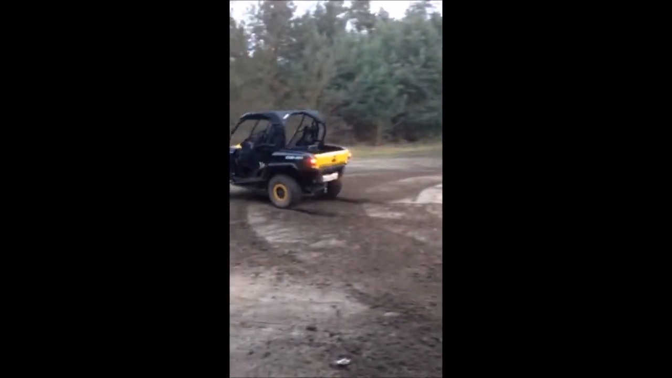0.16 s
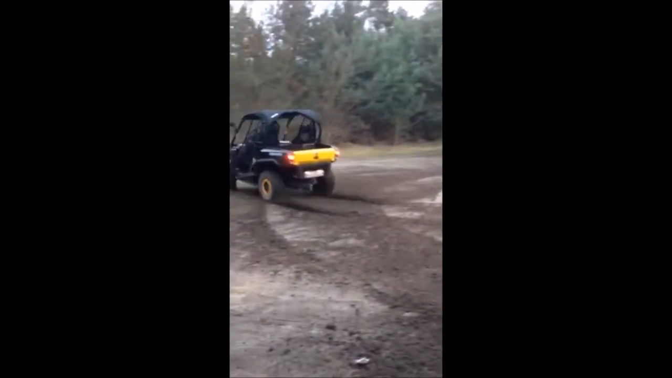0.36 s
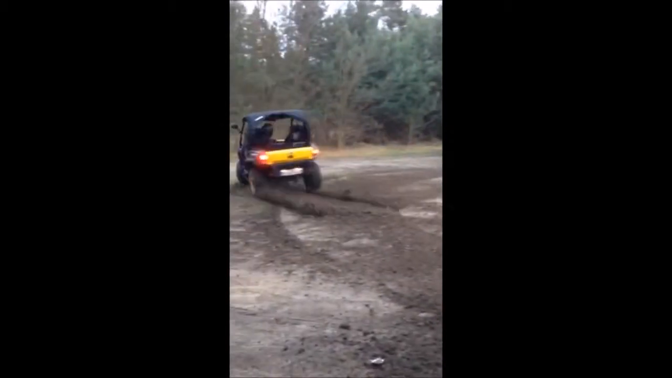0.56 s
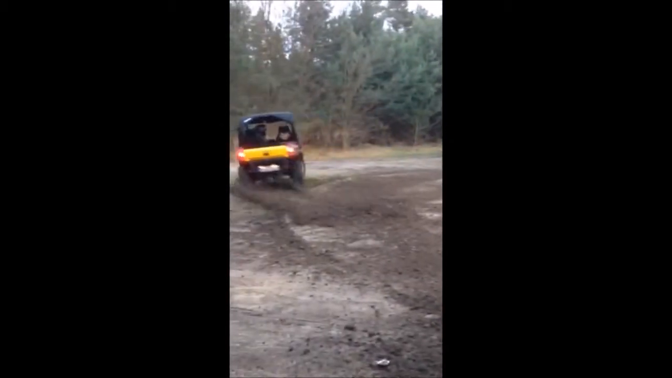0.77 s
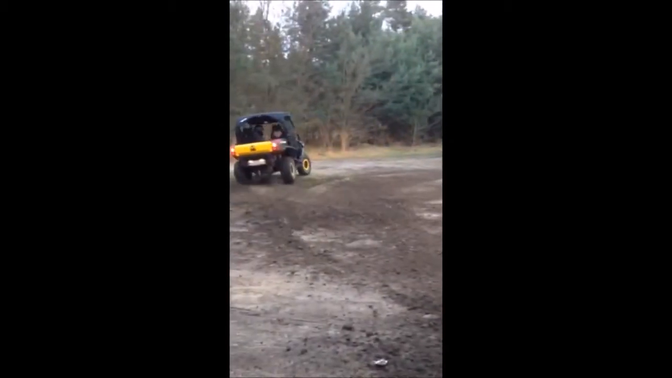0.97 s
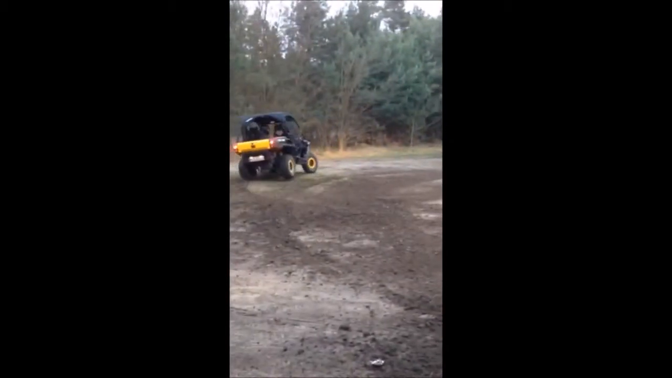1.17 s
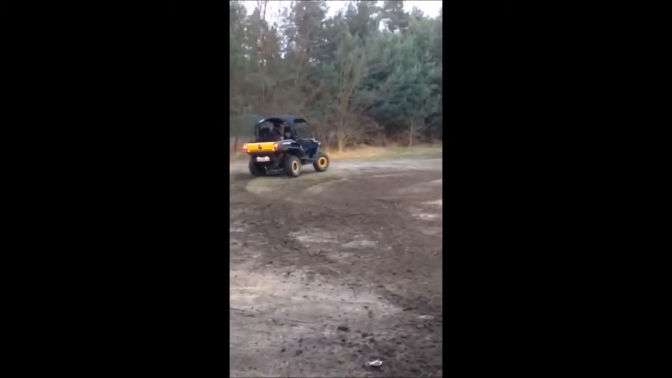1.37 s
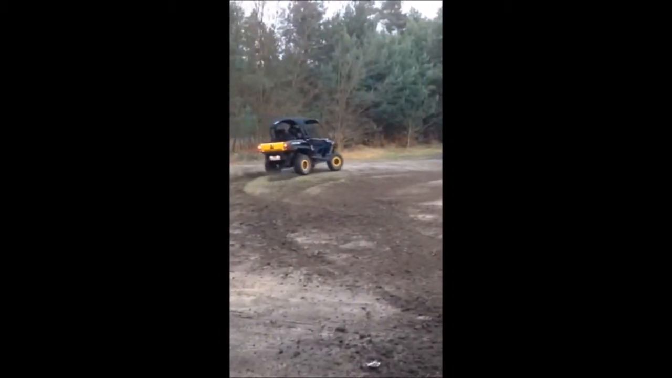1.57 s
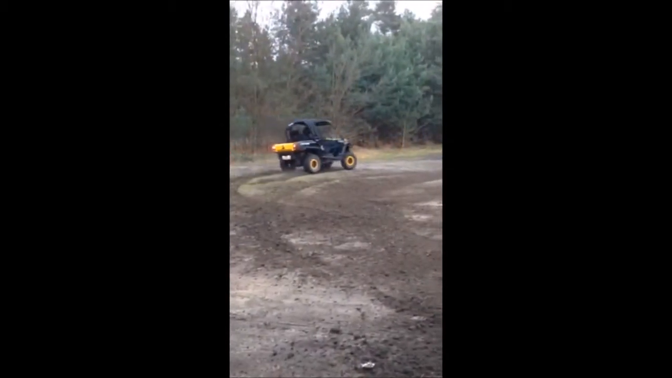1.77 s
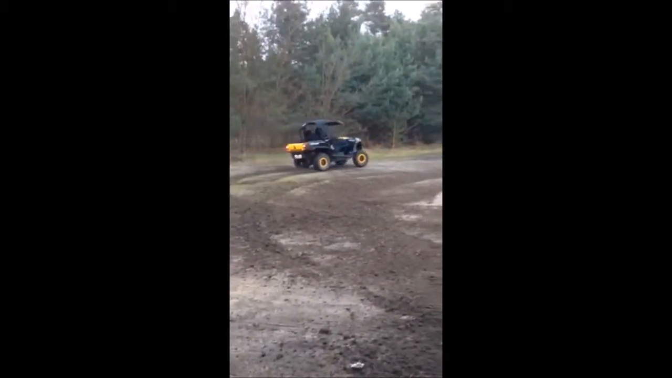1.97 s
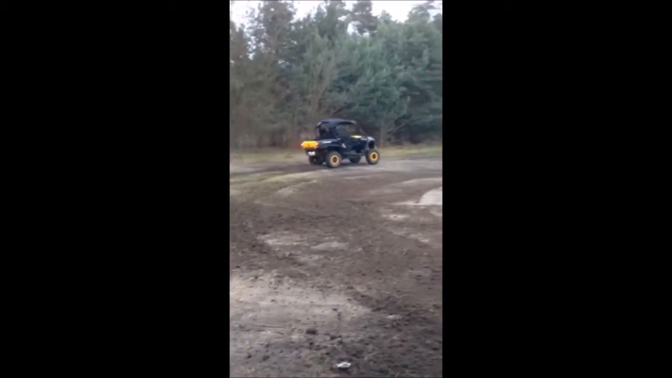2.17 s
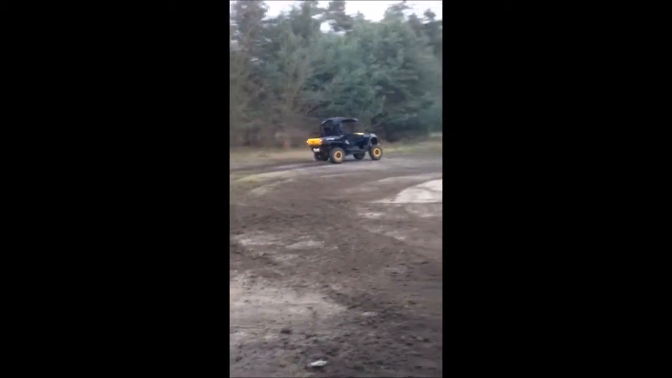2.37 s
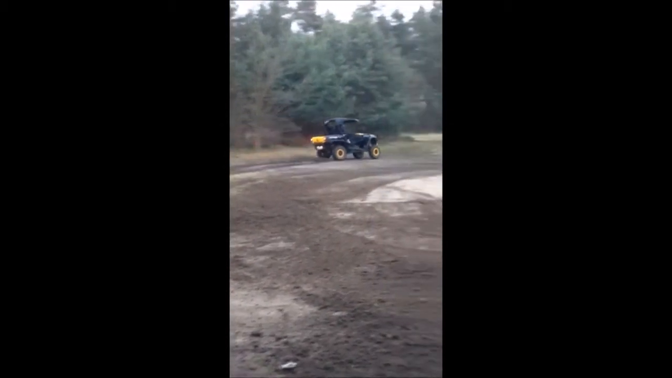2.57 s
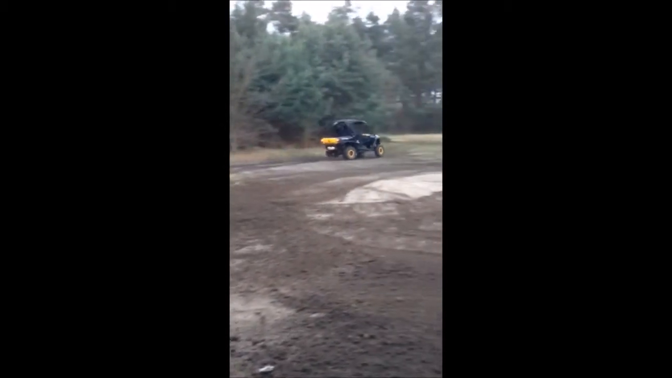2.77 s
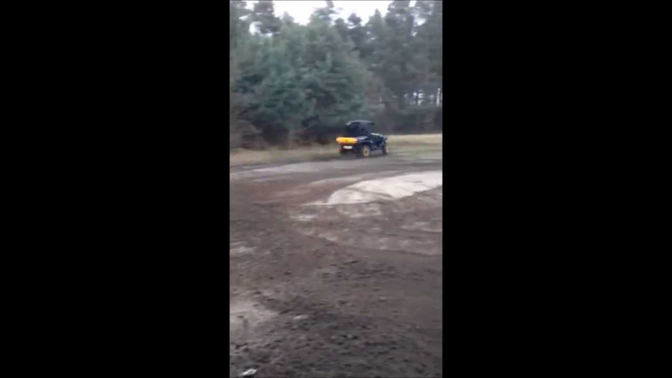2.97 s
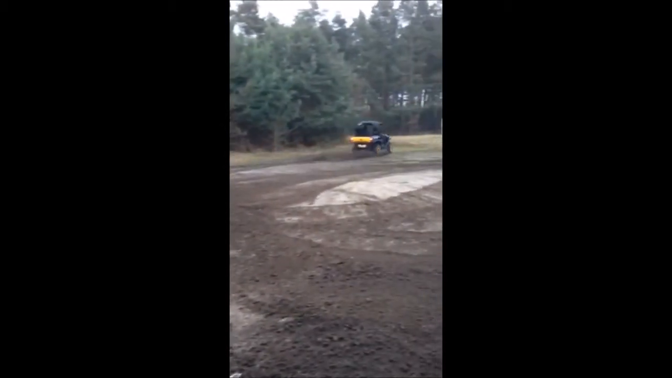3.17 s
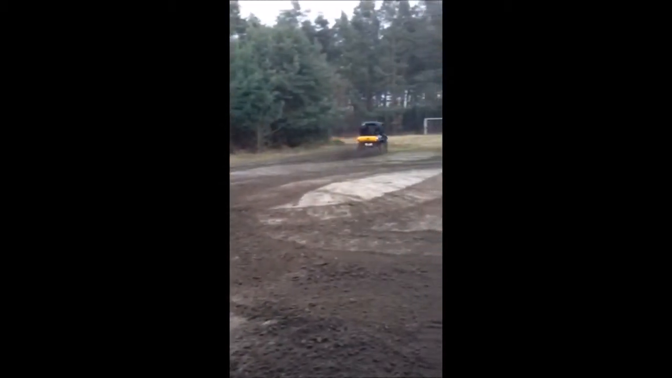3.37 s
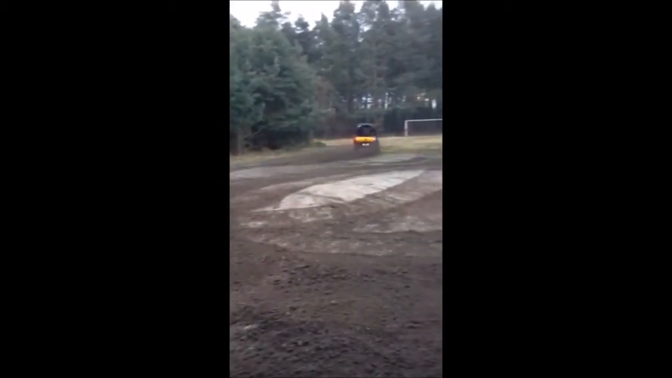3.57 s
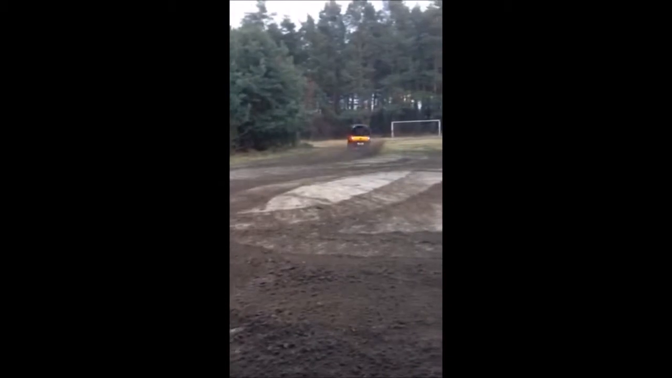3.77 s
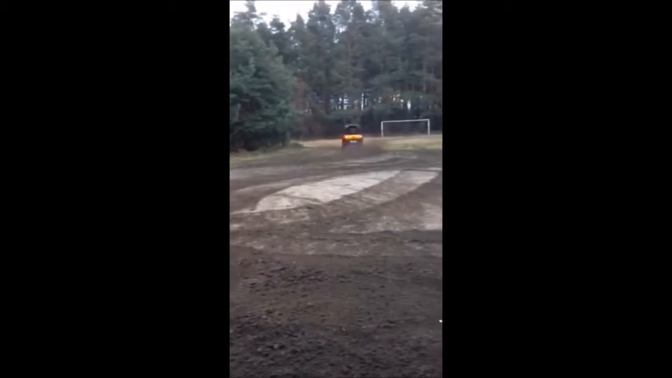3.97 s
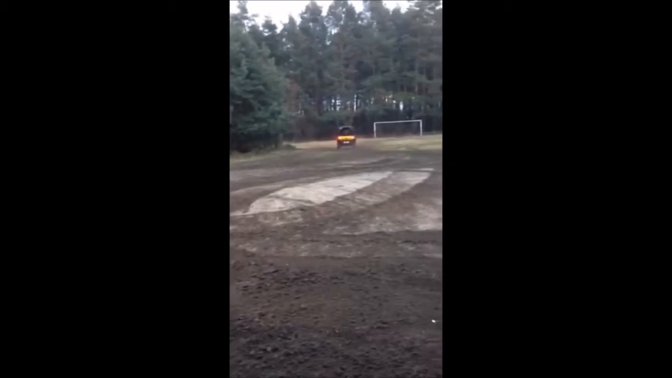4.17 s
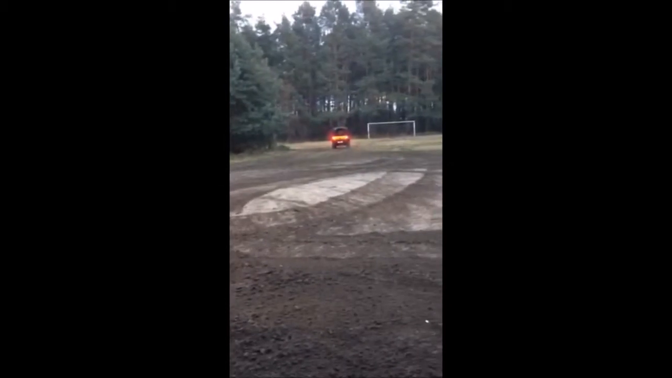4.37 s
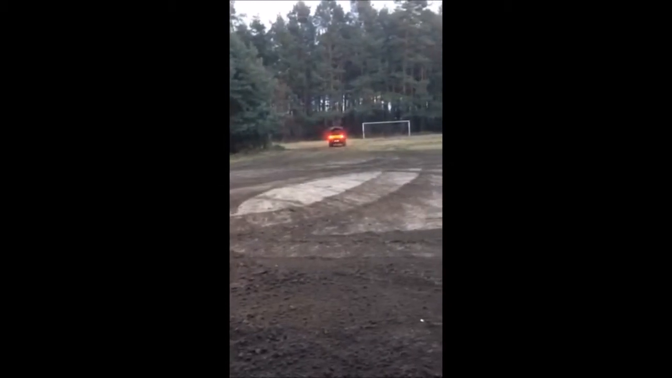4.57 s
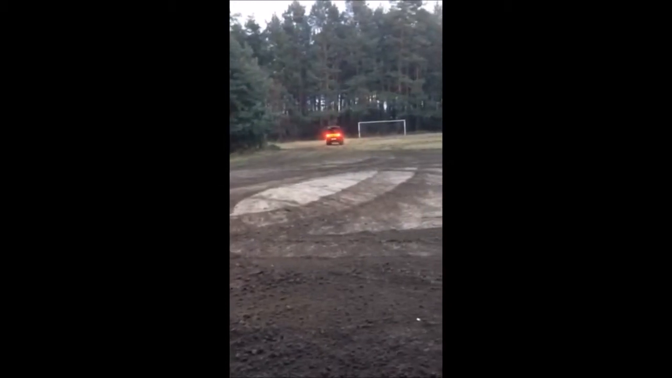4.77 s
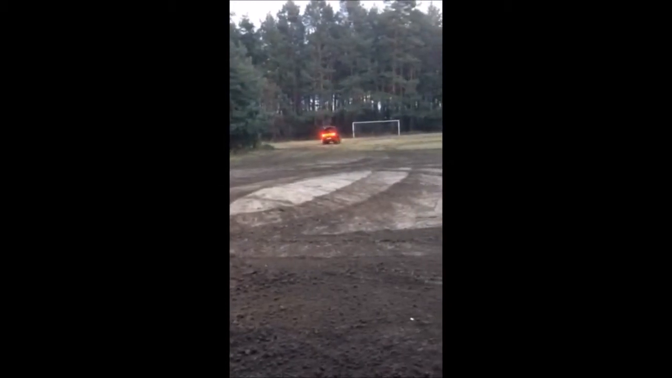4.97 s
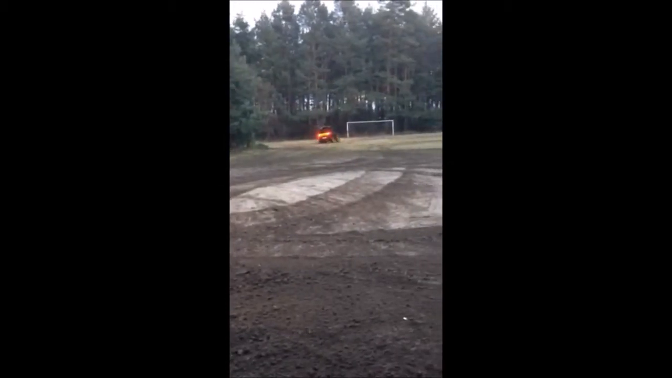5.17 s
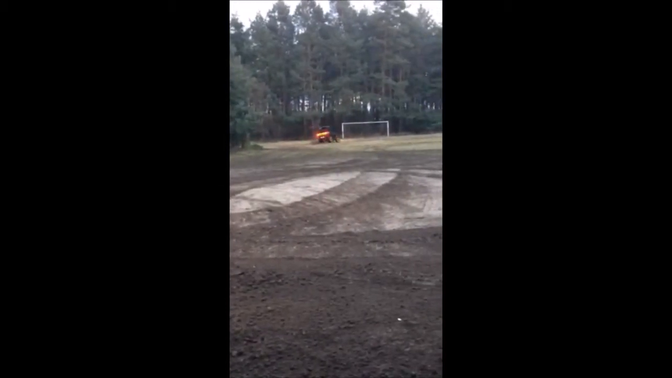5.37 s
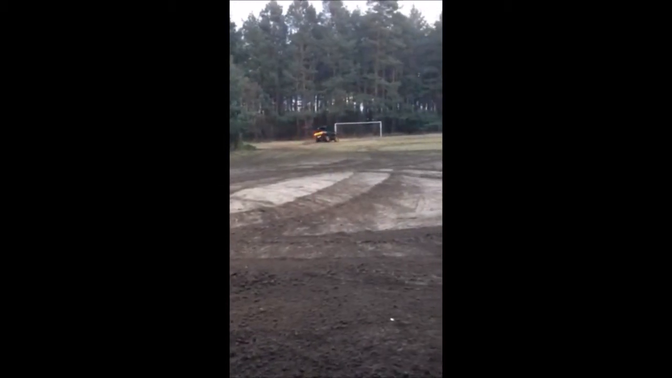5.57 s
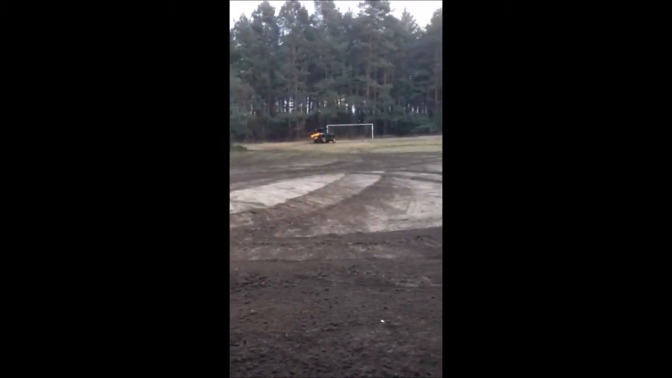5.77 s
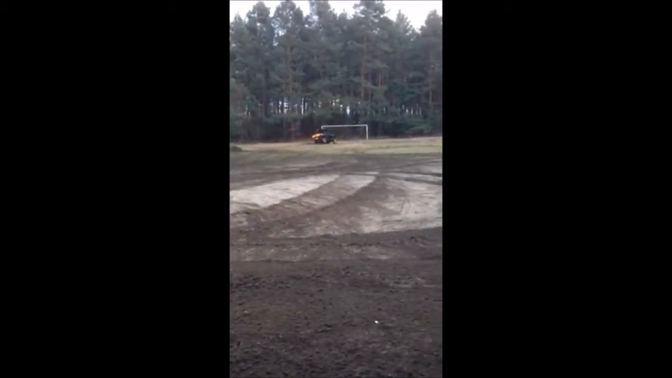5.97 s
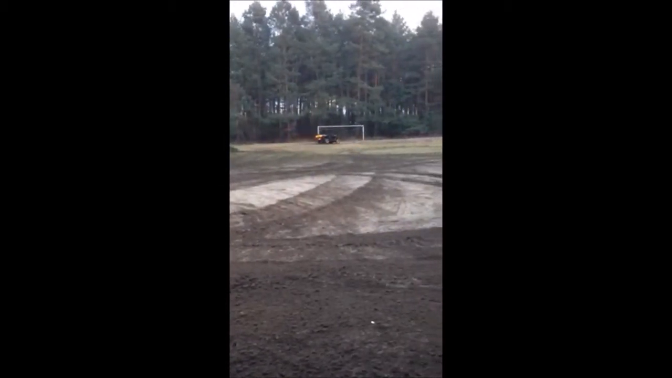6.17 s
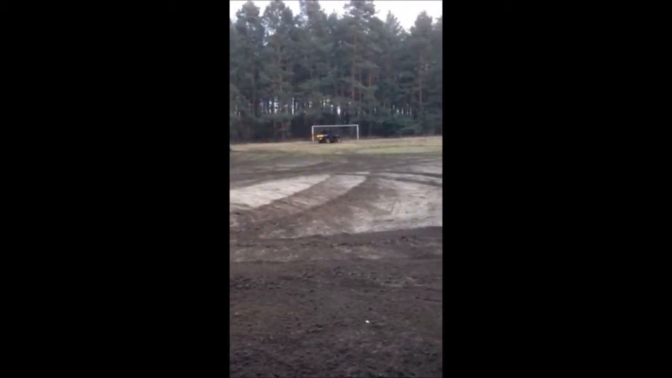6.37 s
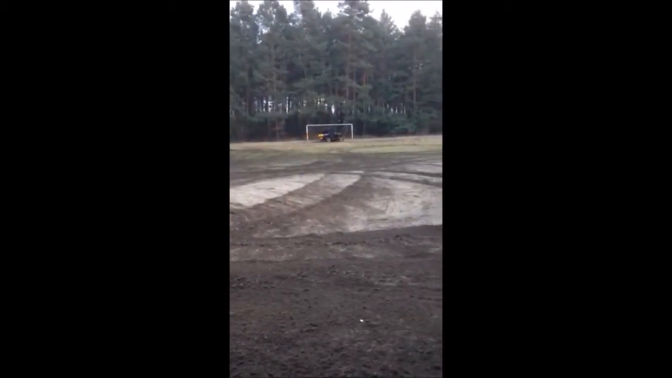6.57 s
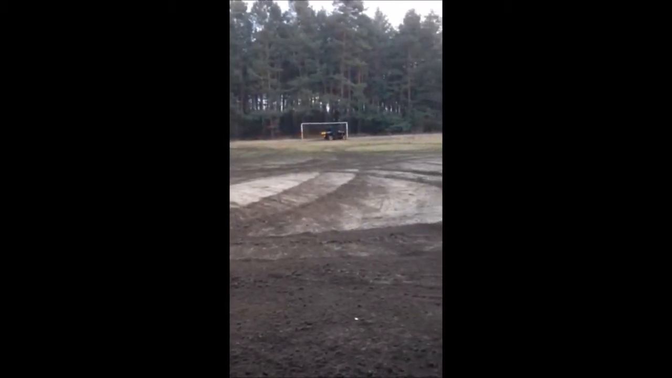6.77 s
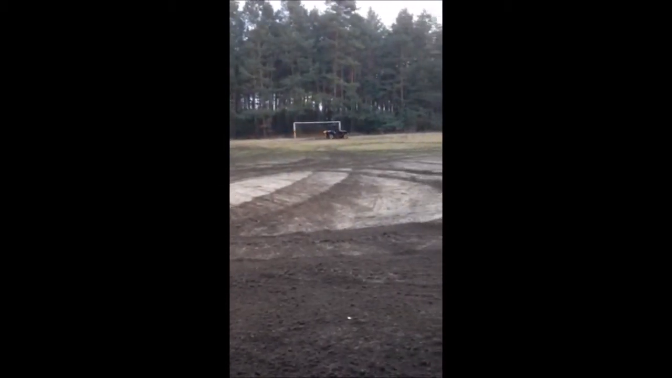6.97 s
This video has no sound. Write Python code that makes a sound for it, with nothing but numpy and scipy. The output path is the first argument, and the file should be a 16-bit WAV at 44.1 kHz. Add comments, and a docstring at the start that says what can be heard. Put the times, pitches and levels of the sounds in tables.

```python
"""A buggy drives off through mud

A V-twin buggy blips its throttle close by, pulls away, coasts far off and blips again.
Its two cylinders fire in an uneven pair into a booming exhaust, each firing with a puff of rasping gas.
Throttle, engine speed, distance and heading set how loud each of the engine's voices is.
The tyres spray soil, the gears whine as the buggy slows, and a wood sends back a faint echo."""
import sys
import numpy as np
from scipy import signal
from scipy.fft import irfft
from scipy.io import wavfile
from scipy.ndimage import uniform_filter1d, map_coordinates

SR = 44100
rng = np.random.default_rng(int(sys.argv[2]) if len(sys.argv) > 2 else 0)


def dump_mix(stems):
    """Bounce the given channels to the path in sys.argv[1] as a 16-bit WAV at rate SR."""
    frames = np.atleast_2d(stems).T  # one column per channel
    limited = np.clip(frames, -1, 1)  # hard clip at full scale
    pcm = np.round(limited * 32767).astype(np.int16)
    wavfile.write(sys.argv[1], SR, pcm)


N = 310023
TIME = np.arange(N) / SR

# low rumble of the open air: f/Hz, level/dB
AIR_SPECTRUM = [(20, -15), (54, -11), (90, 1.5), (150, 6.5), (300, -0.5), (700, -24), (2000, -14),
                (6000, -40), (15000, -48)]
# how far away the buggy is: t/s, distance/m
PATH = [(0, 5.37), (.5, 8.1), (1.1, 18.4), (1.5, 16.5), (2.3, 17.8), (3.7, 18.7), (4.6, 29.6), (5.5, 40),
        (6.2, 81), (7.03, 99)]
# how it is turned: t/s, heading (0 = tail towards the listener, 1 = side on)
SIDE_ON = [(0, 0), (.55, 0.22), (.78, 0.21), (1.18, 0.003), (1.34, 0.23), (1.85, 0.37), (2.25, 0.69),
           (3.1, 0.73), (3.45, 0.36), (3.8, 0.058), (5, 0.12), (6.2, 0.35), (7.03, 0.65)]
# the gear shaft slows with the wheels, then picks up: t/s, f/Hz
SHAFT_SPEED = [(4.42, 728), (4.68, 697), (4.85, 684), (5.04, 617), (5.28, 592), (5.46, 577), (5.62, 535),
               (5.75, 484), (5.92, 459), (6.1, 425), (6.28, 375), (6.42, 362), (6.88, 492)]
# spells in which gears sing: start/s, end/s, multiple of the shaft speed, start level/dB, end level/dB
GEAR_WHINES = [(4.58, 4.987, 5, -51, -53), (4.58, 5.06, 6, -54, -56), (4.92, 5.6, 5, -56, -53),
               (4.98, 5.68, 6, -48.5, -54), (5.697, 6.16, 9, -56.5, -51), (6.222, 6.562, 9, -63, -58),
               (6.83, 7.024, 9, -49, -50)]
# swells of noise from tyres, engine and brakes: t/s, half length/s, churning/dB, hiss/dB, spray/dB
NOISE_SWELLS = [(2.128, 0.091, -35.5, -32, -37), (2.83, 0.067, -72, -68, -31), (3.068, 0.02, -50, -52, -30),
                (3.366, 0.32, -60, -33.5, -62), (4.06, 0.22, -47, -49, -73), (4.83, 0.37, -59, -51, -68),
                (5.396, 0.23, -61, -49.5, -61), (6.277, 0.49, -48, -56.5, -80),
                (6.78, 0.089, -82, -65, -48.5)]
# a churning noise: f/Hz, level/dB
CHURN_SPECTRUM = [(400, -1), (750, 9.5), (1080, 13), (1300, 4), (1700, 8), (2300, -0.5), (3200, -19),
                  (6000, -22)]
# a high spray of fizz and soil: f/Hz, level/dB
SPRAY_SPECTRUM = [(3000, -4), (6000, 0), (7200, -3), (8800, -4), (9900, -3.5), (11000, -7.5),
                  (13000, -10.5), (15500, -20)]

# engine cycles a second: t/s, f/Hz
ENGINE_SPEED = [(0.0, 29.55), (0.11, 37.18), (0.46, 50.99), (0.61, 49.85), (1.03, 27.61), (1.23, 25.95),
                (1.42, 39.82), (1.84, 43.09), (2.22, 50.88), (2.9, 55.15), (2.99, 53.76), (3.22, 56.12),
                (3.78, 55.27), (4.27, 42.1), (4.5, 33.93), (4.87, 33.58), (5.03, 31.22), (5.5, 31.55),
                (5.73, 28.05), (6.07, 27.51), (6.44, 24.64), (6.66, 38.88), (6.85, 43.92), (7.03, 40.38)]
# throttle presses: opens/s, starts to shut/s, closing time/s, depth (1 = full), extra share at the start
THROTTLE_PRESSES = [(-.03, 0.535, 0.27, 0.78, 0.32), (1.245, 3.797, 0.36, 0.79, 0.59),
                    (3.953, 4.22, 0.12, 0.12, 0), (6.502, 6.837, 0.27, 1.15, 0.23)]
# each voice by name ("order k" is the tone at k times the engine speed): base level/dB, then the change
# for full throttle/dB, doubled engine speed/dB, turning side on/dB, doubled distance/dB
VOICE_LEVELS = { "order 1": (-49, 4, 27, -2, -4), "order 2": (-27.5, 2, 11, 4.5, -5),
                "order 3": (-21, 2.5, 17.5, -7.5, -3), "order 4": (-22, 8, 5.5, 0, -4.5),
                "order 5": (-39, -1, 21, 2.5, -2), "order 6": (-35.5, 14.5, -5, -7, -5),
                "bark": (-33, 9.5, 3, 0.5, -6.5), "chuff": (-31.5, 5, 7.5, -4.5, -6),
                "knock": (-43.5, 7, 6, 9.5, -13.5), "clatter": (-40.5, 1.5, 10, 9, -6.5),
                "rasp": (-45.5, 10, 0.5, 14, -7), "spray": (-50, 10, 5, 17.5, -8.5), }
# ringing notes of the engine's covers: f/Hz, width/Hz, level/dB
COVER_RINGS = [(935, 90, -7), (1605, 90, 4), (1785, 90, 1), (2050, 90, -3), (2466, 60, -4)]
# engine clatter: f/Hz, level/dB
CLATTER_SPECTRUM = [(400, -25), (850, 7), (1000, 11.5), (1300, 5), (1620, 2.5), (2000, -0.5), (2400, 6.5),
                    (3500, -22)]
# a hard knock that only carries a few metres: f/Hz, level/dB
KNOCK_SPECTRUM = [(700, -17.5), (1200, -5), (1650, -10.5), (2100, -15.5), (2800, -17), (6000, -39)]
# a rasping hiss: f/Hz, level/dB
RASP_SPECTRUM = [(1200, 0.5), (2200, -6.5), (2700, 7.5), (3900, 8), (5000, 3), (6300, -5.5), (8000, -9),
                 (14000, -70)]
# a duct resonance swells or dips: t/s, half length/s, f/Hz, change/dB
DUCT_HOWLS = [(0.463, 0.11, 485, 3.5), (0.537, 0.058, 636, 5.5), (2.02, 0.069, 442, 9.5),
              (2.173, 0.073, 492, 7.5), (2.093, 0.12, 636, 9.5), (2.38, 0.15, 700, 9),
              (2.902, 0.025, 880, 12.5), (3.05, 0.25, 540, -13), (3.063, 0.17, 910, 3),
              (3.248, 0.43, 614, 7.5), (3.49, 0.41, 420, 7), (4.084, 0.13, 2550, 5.5),
              (6.717, 0.29, 430, 9)]
# firings that crack out under load: t/s, ping/dB, hiss/dB
LOUD_FIRINGS = [(0.071, -19, -17), (0.099, -19, -14), (0.125, -16, -18), (0.151, -17, -25),
                (0.176, -11, -27), (0.2735, -8.5, -24), (1.44, -33, -19), (3.077, -30, -17),
                (3.363, -30, -19)]
# a hard firing rings the covers: f/Hz, level/dB
PING_SPECTRUM = [(900, -34), (1650, 3), (2000, -7), (3200, -33)]
# pops on a shut throttle: t/s, level/dB
PIPE_POPS = [(0.979, -27), (1.049, -22), (1.222, -28)]
# a soft pop in the pipe: f/Hz, level/dB
POP_SPECTRUM = [(60, 0), (190, 3), (400, 1), (900, -37), (2000, -60)]
# gas puffing out of the pipe: f/Hz, level/dB
CHUFF_SPECTRUM = [(20, -19), (50, -3), (110, 0), (200, 10), (320, 7.5), (500, 2), (750, 0), (1000, -10),
                  (1400, -55)]
# how the exhaust pipe shapes its tones: f/Hz, level/dB
PIPE_SPECTRUM = [(55, -7), (110, 13.5), (165, 18.5), (230, 0), (300, -5.5), (400, -11.5), (500, -13.5),
                 (620, -18), (760, -24), (1000, -25), (1500, -45.5)]
# an exhaust tone fades or swells for a moment: t/s, order, half length/s, change/dB
TONE_FADES = [(0.4, 12, 0.25, 7), (0.843, 3, 0.078, -24), (1.157, 4, 0.2, -4.5), (1.475, 4, 0.14, 4.5),
              (1.644, 10, 0.69, 6), (2.262, 4, 0.17, -15), (3.07, 17, 0.1, 10), (3.416, 2, 0.34, -14),
              (3.975, 4, 0.082, -10), (4.838, 3, 1, -13), (5.2, 2, 0.69, -4.5), (6.13, 4, 0.56, -4)]

NEAR_M, CRUISE_HZ = 10, 40  # distance and engine speed at which the base levels hold
PAIR_GAP = 0.2904  # the second cylinder fires this share of a cycle after the first


def amp(db):
    """Turns decibels into a gain."""
    return 10 ** (np.asarray(db) / 20)


def unit(x):
    """Scales a signal to an average size (rms) of 1."""
    return x / np.sqrt(np.mean(x ** 2) + 1e-20)


def curves(rows):
    """Joins each column of a table with straight lines in time."""
    times, *columns = np.transpose(rows)
    return [np.interp(TIME, times, column) for column in columns]


def swell(s, half_s):
    """A smooth rise and fall around the moment s."""
    return np.exp(-((TIME - s) / half_s) ** 2)


def wander(rate):
    """A smooth random wobble with about rate new values a second."""
    values, coarse = rng.standard_normal(4096), TIME[::32]
    smooth = map_coordinates(values, [coarse * rate], order=3, mode="wrap")
    return unit(np.interp(TIME, coarse, smooth))


def gains(spectrum, at_hz):
    """Reads a spectrum's gain at the given frequencies."""
    hz, db = np.transpose(spectrum)
    return amp(np.interp(np.log(abs(at_hz) + 1), np.log(hz), db))


def colour(x, spectrum):
    """Filters a sound by a spectrum and scales it to size 1."""
    taps = np.fft.fftshift(irfft(gains(spectrum, np.fft.rfftfreq(N, 1 / SR))))
    return unit(signal.oaconvolve(x, taps[N // 2 - 2049:N // 2 + 2048], "same"))


def response(spectrum, size=8192):
    """Frequencies, and the gain and phase at each, of a filter that rings only after it is struck."""
    hz = np.fft.fftfreq(size, 1 / SR)
    log_gain = np.log(gains(spectrum, hz))
    return hz[:size // 2], np.exp(np.conj(signal.hilbert(log_gain)))[:size // 2]


def open_air():
    """The outdoors rumbles quietly and steadily."""
    return amp(-42.5) * colour(rng.standard_normal(N), AIR_SPECTRUM)


def forest_echo(x, fade_s=1.0, delay_s=.04):
    """The edge of the wood scatters back a faint, dull tail."""
    t = TIME[:SR]
    tail = rng.standard_normal(SR) * amp(-60 * t / fade_s) * (t > delay_s)
    dull_tail = signal.lfilter([.2], [1, -.8], tail / np.linalg.norm(tail))
    return amp(-22) * signal.oaconvolve(x, dull_tail)[:N]


def reflections(x):
    """Shifting reflections off the bodywork and the ground lift and sink narrow bands for a moment."""
    bands = signal.stft(x, nperseg=512)[2]
    patches = rng.standard_normal(bands.shape[::-1])
    patches = uniform_filter1d(patches, 18, axis=0)  # smooth over time
    patches = uniform_filter1d(patches, 2, axis=1)  # and over frequency
    lift = unit(amp(1.7 * unit(patches.T)))
    return signal.istft(bands * lift, nperseg=512)[1][:N]


def gear_whine(fade_s=0.1):
    """Meshing gears sing with a grainy edge at multiples of one shaft that turns with the wheels."""
    shaft_hz, = curves(SHAFT_SPEED)
    whine = 0
    for start, end, multiple, *db in GEAR_WHINES:
        fade = np.clip(np.minimum(TIME - start, end - TIME) / fade_s, 0, 1)
        turns = np.cumsum(round(multiple) * shaft_hz * (1 + .008 * wander(240))) / SR
        grain = amp(1.2 * wander(24)) * (1 + .45 * (wander(130) + 1j * wander(130)))
        tone = (grain * np.exp(2j * np.pi * turns)).real
        whine += fade * amp(np.interp(TIME, (start, end), db)) * tone
    return whine


def crumbs(spread_db, per_s=2000):
    """Crumbs of soil land as scattered clicks of very different sizes."""
    sizes = amp(spread_db * np.minimum(rng.exponential(1, N), 4))
    return unit(sizes * rng.standard_normal(N) * (rng.random(N) < per_s / SR))


def churn_and_hiss():
    """Gritty churning, hiss and spray from tyres, engine and brakes swell at set moments."""
    layers = [colour(rng.standard_normal(N) + crumbs(spread_db=5.5), spectrum)
              for spectrum in (CHURN_SPECTRUM, RASP_SPECTRUM, SPRAY_SPECTRUM)]
    return sum(swell(s, half_s) * amp(db) * layer
               for s, half_s, *levels in NOISE_SWELLS for db, layer in zip(levels, layers))


def pedal(opening_s=0.03, surge_s=0.095):
    """Load on the engine: each press opens quickly with a surge, holds and closes more slowly."""
    throttle = 0
    for opens, shuts, closing_s, depth, extra in THROTTLE_PRESSES:
        surge = 1 + extra * np.exp(-abs(TIME - opens) / surge_s)
        opening = np.clip((TIME - opens) / opening_s, 0, 1)
        closing = np.clip(1 - (TIME - shuts) / closing_s, 0, 1)
        throttle += depth * surge * opening * closing
    return throttle


def loudness(speed, throttle, build_s=0.023):
    """Each voice's gain from throttle, engine speed, heading and distance."""
    (metres,), (side_on,) = curves(PATH), curves(SIDE_ON)
    revs, far = np.log2(speed / CRUISE_HZ), np.log2(metres / NEAR_M)
    hold = np.exp(-1 / (build_s * SR))
    lagging = signal.lfilter([1 - hold], [1, -hold], throttle, zi=throttle[:1])[0]
    built = np.minimum(throttle, lagging)  # the high noises take a moment to build
    level = {}
    for name, (db, push_db, rev_db, side_db, far_db) in VOICE_LEVELS.items():
        drive = built if name in ("clatter", "rasp", "spray") else throttle
        level[name] = amp(db + push_db * drive + rev_db * revs + side_db * side_on + far_db * far)
    return level


def puffs(turns, speed, punch, lag_s=.0037, decay_s=.003, steady=.55, uneven_db=2, rise_s=.0018):
    """Noise bursts out as each exhaust valve opens, then dies away; with little punch it is nearly even."""
    pulses = 0
    for delay, size in ((0, 1), (PAIR_GAP, 0.69)):
        cycle, part = np.divmod(turns - lag_s * speed - delay + 2 + .5, 1)
        from_peak_s = (part - .5) / speed
        strengths = amp(uneven_db * rng.uniform(-1, 1, 1024))
        shape = np.exp(-abs(from_peak_s) / np.where(from_peak_s < 0, rise_s, decay_s))
        pulses += size * strengths[cycle.astype(int)] * shape
    flow = steady + punch * pulses
    return flow / np.sqrt(uniform_filter1d(flow ** 2, SR // 8)) * rng.standard_normal(N)


def covers(x):
    """The engine's metal covers ring briefly with every knock, most clearly from close by."""
    metres, = curves(PATH)
    rings = sum(amp(db) * signal.lfilter(*signal.iirpeak(hz, hz / width, SR), x)
                for hz, width, db in COVER_RINGS)
    return x + amp(-2 * np.log2(metres / NEAR_M)) * rings


def duct(x):
    """Resonances swell and fade at set moments, colouring the engine's sound."""
    howls = sum((amp(db) - 1) * swell(s, half_s) * signal.lfilter(*signal.iirpeak(hz, Q=6.9, fs=SR), x)
                for s, half_s, hz, db in DUCT_HOWLS)
    return x + howls


def engine_rattle(firing, level, flicker):
    """Each firing shakes the covers, giving a clatter and a harder knock."""
    clatter = colour(covers(puffs(*firing)), CLATTER_SPECTRUM)
    knock = colour(covers(puffs(*firing, steady=.45)), KNOCK_SPECTRUM)
    return level["clatter"] * flicker * clatter + level["knock"] * knock


def rasp_and_spray(firing, level):
    """Jets of gas rasp with each firing; above them a thin fizz mixes with flying soil."""
    rasp = colour(puffs(*firing, decay_s=.0036), RASP_SPECTRUM)
    fizz = puffs(*firing, lag_s=.0038, decay_s=.004, steady=.65, uneven_db=3)
    spray = colour(fizz + .24 * crumbs(spread_db=2.4), SPRAY_SPECTRUM)
    return level["rasp"] * rasp + level["spray"] * spray


def burst(s, db, decay_s, spectrum):
    """One short burst of gas at the moment s, shaped by a spectrum and peaking at db."""
    t = TIME[:4096]
    ring = irfft(np.append(response(spectrum)[1], 0))[:len(t)]
    sound = signal.fftconvolve(rng.standard_normal(len(t)) * np.exp(-t / decay_s), ring)
    return np.pad(amp(db) * sound / abs(sound).max(), (round(s * SR), N))[:N]


def cracks_and_pops(crack_s=0.0012, pop_s=0.0019):
    """Under load a few firings crack out above the rest; on a shut throttle the pipe pops softly."""
    cracks = sum(burst(s, ping_db, crack_s, PING_SPECTRUM) + burst(s, hiss_db, crack_s, RASP_SPECTRUM)
                 for s, ping_db, hiss_db in LOUD_FIRINGS)
    return cracks + sum(burst(s, db, pop_s, POP_SPECTRUM) for s, db in PIPE_POPS)


def exhaust_chuff(firing, level):
    """Each firing pushes a low, breathy puff of gas out of the pipe."""
    gas = puffs(*firing, lag_s=.004, decay_s=.006, uneven_db=3)
    return level["chuff"] * colour(gas, CHUFF_SPECTRUM)


def exhaust_tones(turns, speed, throttle, level, flutter=0.11, misfire=0.04):
    """Pairs of pressure pulses ring the pipe: the low tones boom and the higher ones bark."""
    hz, pipe = response(PIPE_SPECTRUM)
    boom = bark = bark_power = 0
    for k in range(1, 24):
        name = "order " + str(k)
        booming = name in level
        wave = np.exp(2j * np.pi * k * turns)
        second_size = 0.74 if booming else 0.47  # the second firing is blunter: weaker overtones
        pair = 1 + second_size * np.exp(-2j * np.pi * k * PAIR_GAP)
        weight = np.interp(k * speed, hz, pipe) * pair
        fade = amp(sum(db * swell(s, half_s) for s, order, half_s, db in TONE_FADES if order == k))
        if booming:
            boom += np.sqrt(2) * level[name] * fade * (weight * wave).real / abs(weight)
        else:
            weight *= amp(3 * wander(8))  # ground reflections make each tone fade slowly
            weight *= np.clip((k * speed - 170) / 100, 0, 1)  # the bark lies above the boom
            # uneven burning smears the tone, most on a shut throttle
            smear = 1 + (.11 + .25 * np.maximum(1 - throttle, 0)) * (wander(45) + 1j * wander(45))
            bark += fade * (weight * smear * wave).real
            bark_power += abs(weight) ** 2 / 2
    strength = 1 + (flutter + misfire * (1 - throttle)) * wander(60)  # no two firings are equally strong
    return strength * (boom + level["bark"] * bark / np.sqrt(bark_power))


def scene():
    """One crankshaft times the engine's tones and puffs; noise swells, gears, echo and air join them."""
    (speed,), (metres,) = curves(ENGINE_SPEED), curves(PATH)
    throttle = pedal()
    level = loudness(speed, throttle)
    turns = .83 + np.cumsum(speed) / SR + 0.0015 * wander(80)  # engine cycles so far, slightly shaky
    # each firing hits hardest under load at low revs, and distance blurs it
    punch = np.clip(throttle, .18, 1) * np.clip(48 / speed, 1, 1.25) ** 2 * np.minimum(1, 35 / metres)
    firing = turns, speed, punch
    flicker = amp(.7 * wander(26))  # hiss and clatter flicker slightly and at random in level
    chuff = exhaust_chuff(firing, level)
    rattle = duct(engine_rattle(firing, level, flicker))
    hiss = flicker * (rasp_and_spray(firing, level) + churn_and_hiss())
    roar = reflections(rattle + hiss) + cracks_and_pops()
    exhaust = duct(exhaust_tones(turns, speed, throttle, level) + chuff)
    buggy = exhaust + roar + gear_whine()
    return (open_air() + forest_echo(buggy) + buggy)[None]


def record(dry, top_hz=15550):
    """Clips any peak beyond full scale, then cuts the highest treble."""
    low_pass = signal.firwin(511, top_hz, window=("kaiser", 9), fs=SR)
    return signal.oaconvolve(np.clip(dry, -1, 1), low_pass[None], "same")


dry = scene()
out = record(dry)
dump_mix(out)
```